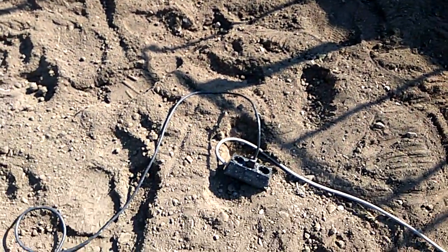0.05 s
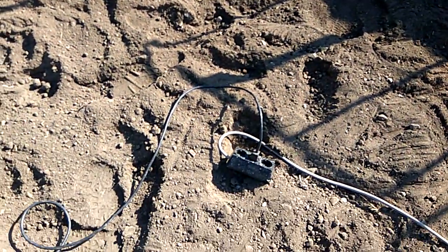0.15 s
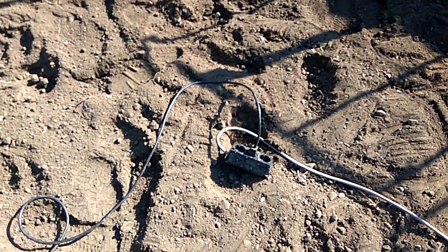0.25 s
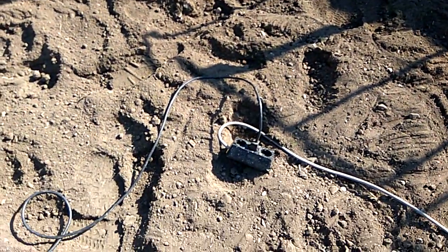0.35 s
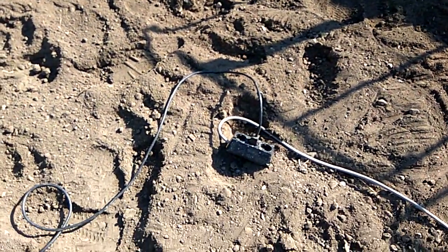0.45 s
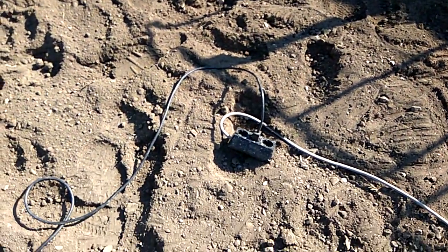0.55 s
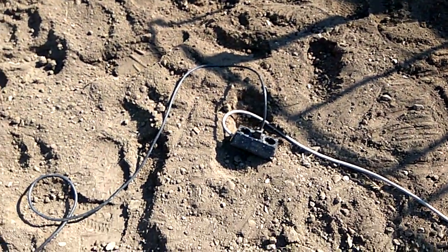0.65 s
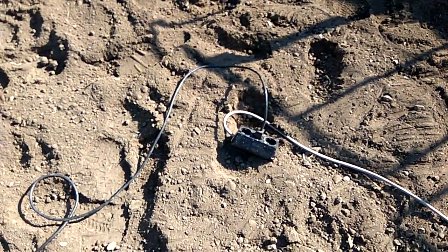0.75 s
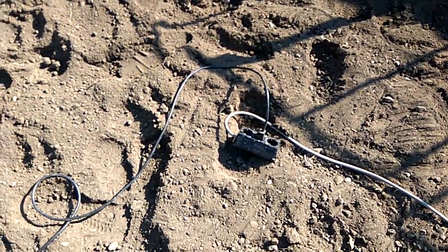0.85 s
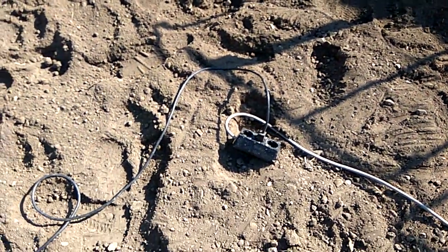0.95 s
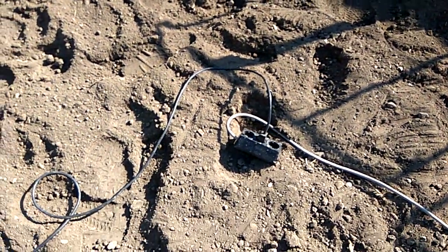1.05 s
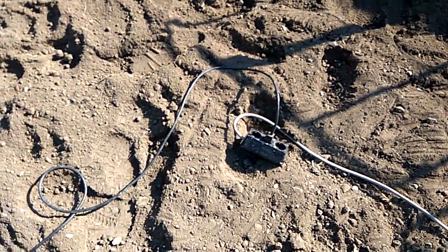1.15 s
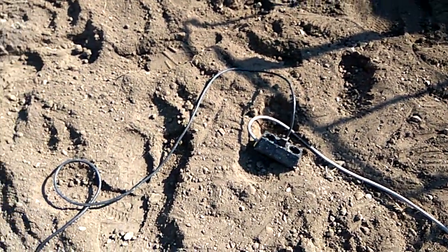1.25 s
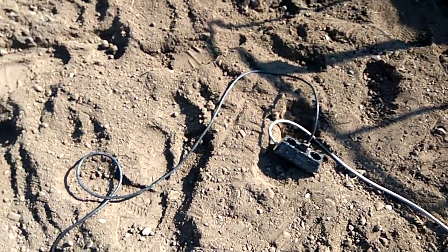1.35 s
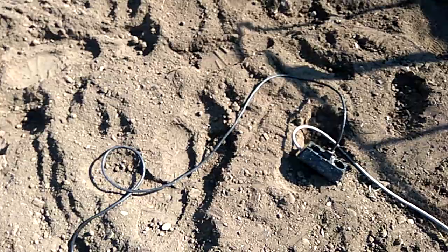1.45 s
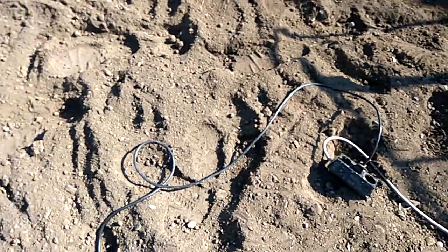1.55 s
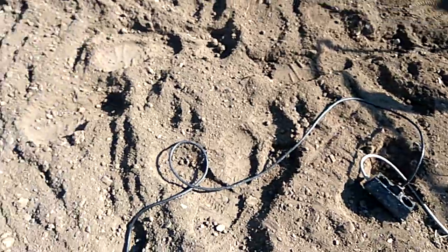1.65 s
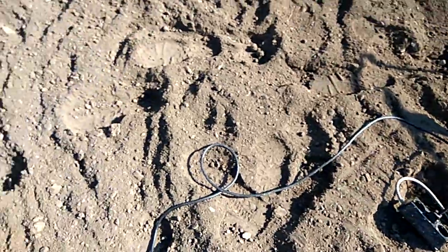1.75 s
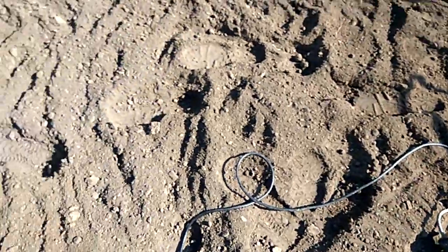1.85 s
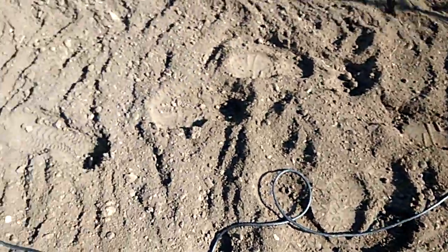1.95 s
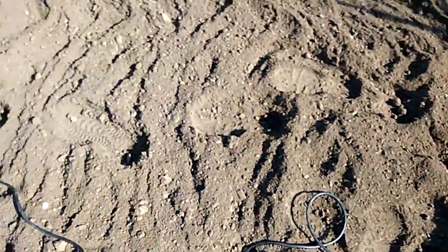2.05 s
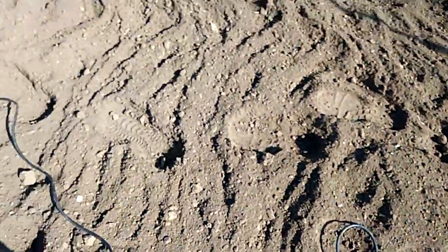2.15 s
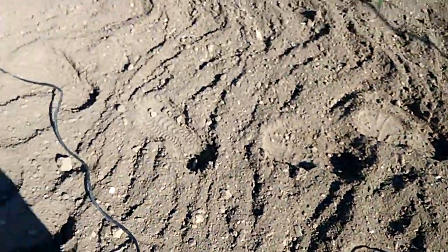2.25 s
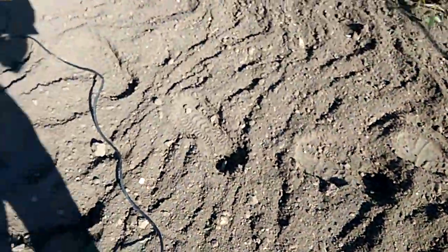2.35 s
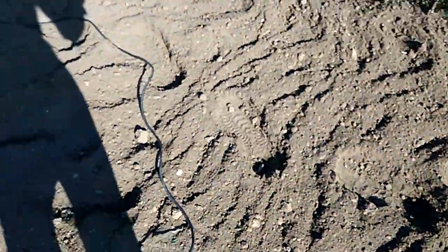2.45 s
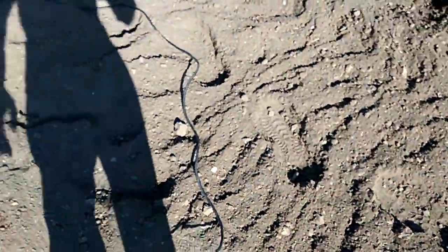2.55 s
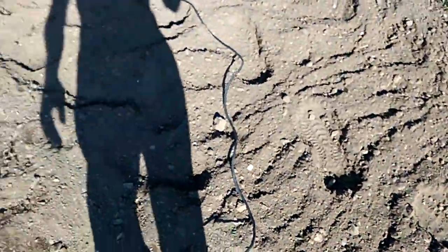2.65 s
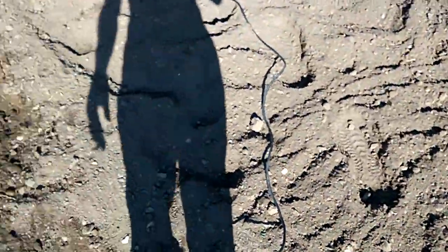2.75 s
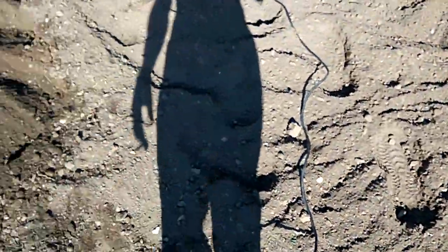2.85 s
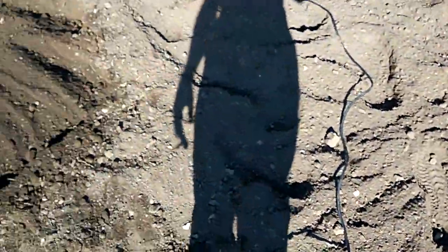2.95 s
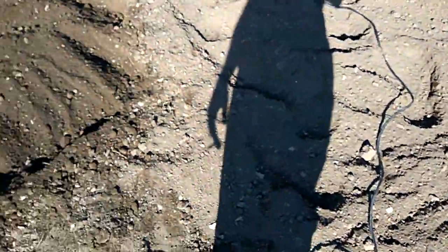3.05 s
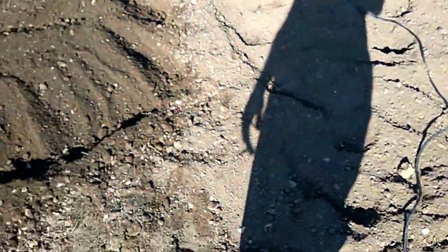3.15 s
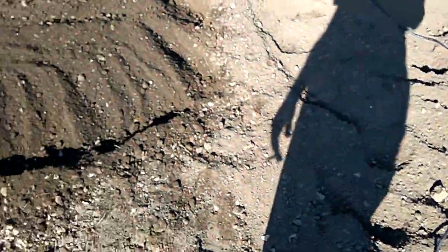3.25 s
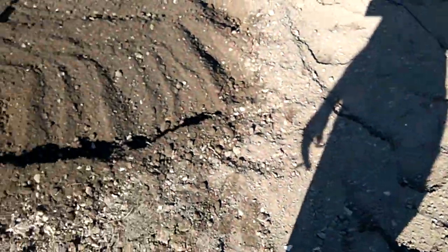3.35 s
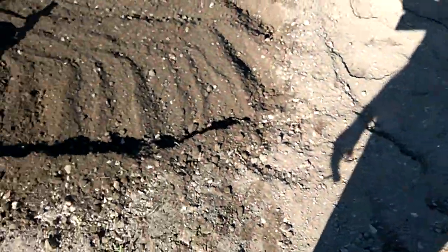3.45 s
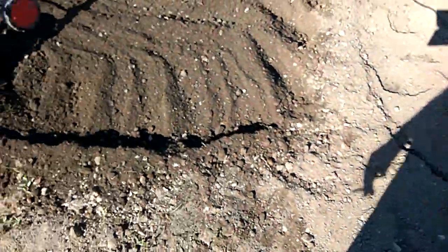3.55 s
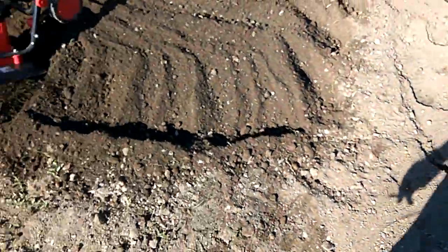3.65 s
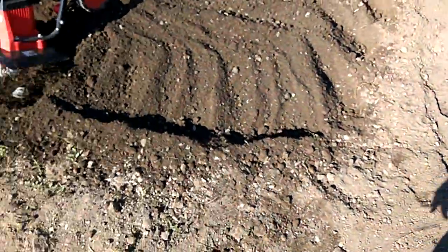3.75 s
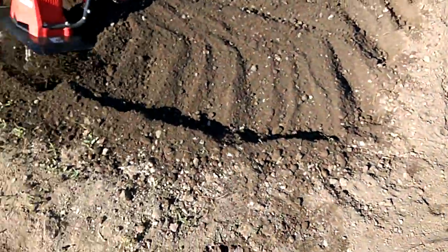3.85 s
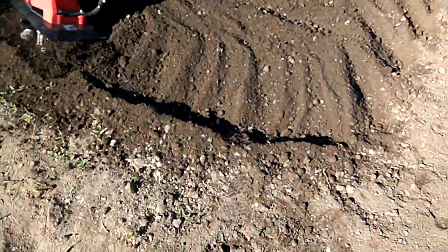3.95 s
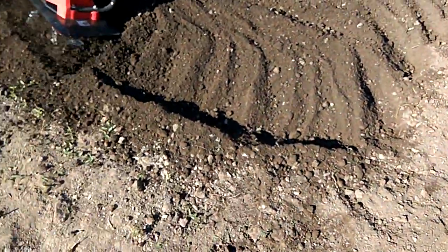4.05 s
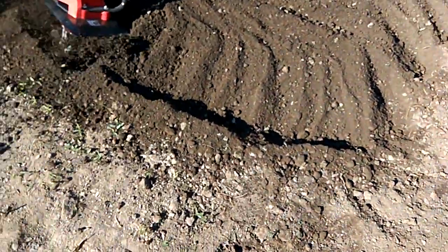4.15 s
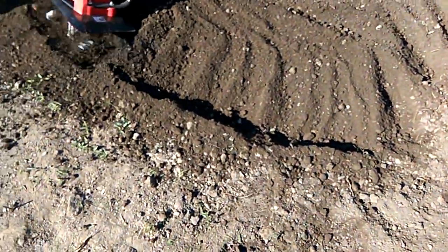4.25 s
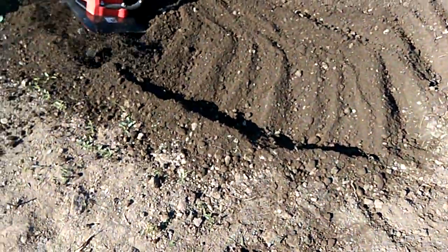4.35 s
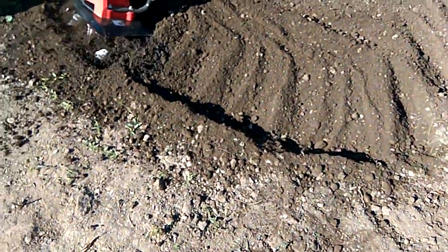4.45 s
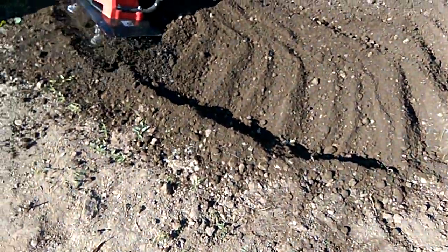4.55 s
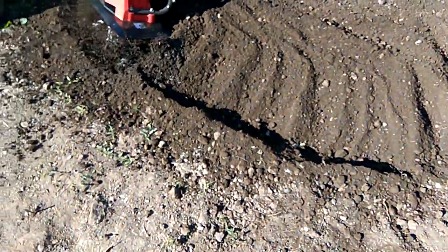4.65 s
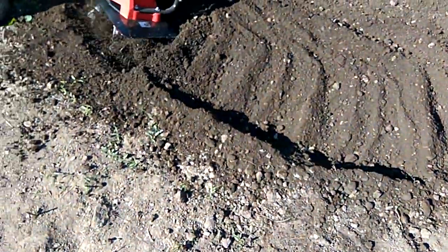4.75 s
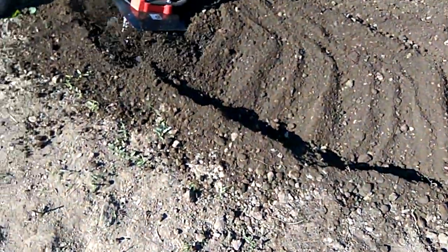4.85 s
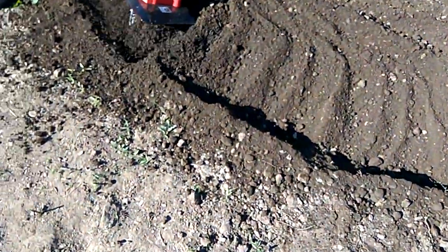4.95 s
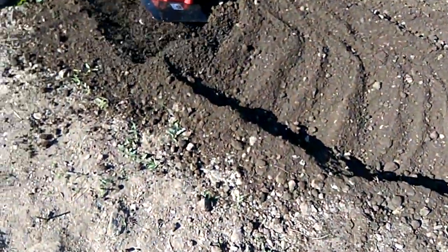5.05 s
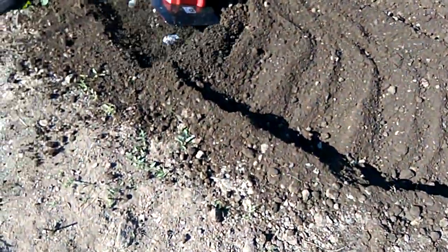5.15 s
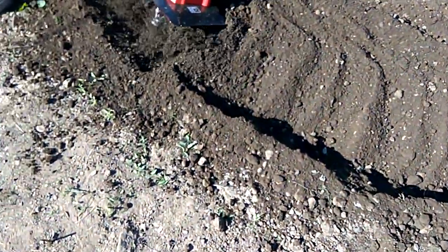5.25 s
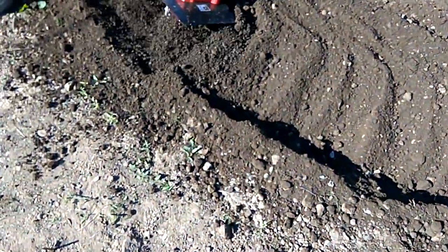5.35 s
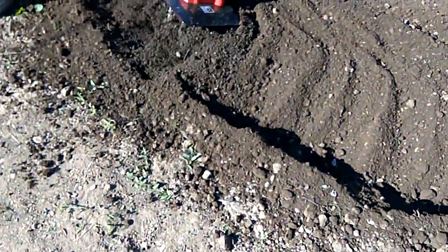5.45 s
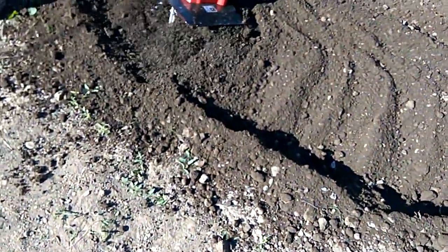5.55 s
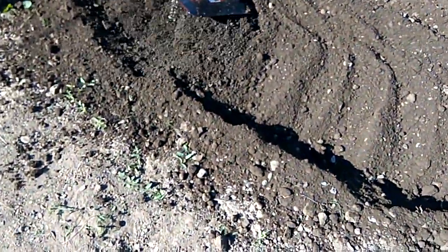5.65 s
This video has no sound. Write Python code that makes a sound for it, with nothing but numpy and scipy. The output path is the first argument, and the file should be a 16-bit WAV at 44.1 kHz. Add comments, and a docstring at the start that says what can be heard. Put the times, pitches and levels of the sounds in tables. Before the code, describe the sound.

A handheld stereo camera hears an electric tiller in a garden, first from behind and then facing it. A buzzing high whine, airy fan rush and fine crumbly grit play throughout. Early bites make the pitch dip quickly; a lighter, quieter passage follows. Later the sound opens up, broad and rough, with repeated labouring dips, jolts and sprays of soil, before easing into a steadier whine. A faint low drone lies far away.

```python
"""An electric tiller works loose soil: its pinion whines, its fan rushes, its tines throw crumbs.
One motor shaft paces the tones; each bite of the tines slows it, chokes the whine and stirs up soil.
The sound reaches the two microphone ports of a camera that starts with its back to the machine,
then swings round to face it. Ground echo and scatter shape the noise on the way.
A faint low drone hangs far over the garden, and a light breeze touches the microphone."""
import sys
import numpy as np
from scipy import signal
from scipy.fft import rfft, irfft, next_fast_len
from scipy.io import wavfile
from scipy.ndimage import uniform_filter1d, map_coordinates

SR = 44100
rng = np.random.default_rng(int(sys.argv[2]) if len(sys.argv) > 2 else 0)


def store_wav(level_fs):
    """Save 16-bit WAV to argv[1]."""
    pcm = np.round(np.clip(np.atleast_2d(level_fs), -1, 1) * 32767)
    wavfile.write(sys.argv[1], SR, pcm.T.astype(np.int16))


N = 250488

PINION_TEETH, WHEEL_TEETH = 7, 29

# Bearing of the machine from the camera:
# (time [s], lag of the left port [ms], how far behind the camera [0-1])
BEARING_PATH = [(0, -0.11, 0.86), (1.2, -0.089, 0.82), (1.6, -0.097, 0.63), (1.95, 0.24, 0.47),
                (2.6, 0.373, 0.13), (3.1, 0.396, 0.23), (3.45, 0.343, 0.1), (3.9, 0.23, 0.13),
                (4.7, 0.16, 0.25), (5.68, 0.071, 0.3)]
# Work of the tines: (time [s], digging load [0-1], rotor hum before trim [dB])
WORK_PATH = [(0, .25, -38), (.7, .15, -38.5), (1.1, 0, -36.5), (1.6, 0, -34), (2.1, 0, -38.5),
             (2.8, .1, -38.5), (3.1, 1, -44), (3.7, 1, -46), (4.5, 1, -44), (4.9, .8, -38), (5.3, .35, -33),
             (5.68, .35, -34)]
# Noise at the tines and fan, before trims:
# (time [s], soil rumble [dB], fan rush [dB], fine grit [dB])
CHURN_LEVELS = [(0, -34, -24, -25.5), (.6, -31, -24.5, -25), (1.35, -34.5, -24, -28),
                (1.93, -29.5, -29.5, -39.5), (2.25, -29, -21, -31.5), (2.7, -26, -19.5, -27.5),
                (3.25, -20, -16, -26.5), (3.75, -23.5, -14, -29.5), (4.5, -23, -15.5, -28),
                (5.1, -23, -14, -24.5), (5.68, -22, -14, -25.5)]


def amp(db):
    """Decibels to gain."""
    return 10 ** (np.asarray(db) / 20)


def unit(x):
    """Scale to rms 1."""
    return x / np.sqrt(np.mean(x ** 2) + 1e-20)


def curves(rows):
    """One value per sample for each column after the time."""
    s, *cols = np.transpose(rows)
    return [np.interp(np.arange(N) / SR, s, c) for c in cols]


def wobble(rate):
    """A smooth random curve of rms 1, rate knots a second."""
    knots = rng.standard_normal(int(N * rate / SR) + 4)
    return unit(map_coordinates(knots, [np.arange(N) * rate / SR]))


def filtered(x, response):
    """Multiply the spectrum of x by a response of frequency."""
    m = next_fast_len(N + 8192)
    return irfft(rfft(x, m) * response(np.fft.rfftfreq(m, 1 / SR)), m)[..., :N]


def along(points, hz):
    """Gain of (frequency [Hz], level [dB]) points on a log frequency axis."""
    f, db = np.transpose(points)
    return amp(np.interp(np.log(hz + 1), np.log(f), db))


def colour(x, points):
    """Shape x by a spectrum."""
    return filtered(x, lambda hz: along(points, hz))


def behind():
    """How far the camera is turned away from the machine, 0-1."""
    return np.clip(curves(BEARING_PATH)[1], 0, 1)


def digging():
    """Load on the tines, 0-1."""
    return curves(WORK_PATH)[0]


def sag(lag_s=0):
    """Turns a second that the shaft loses while a blade cuts into firm soil."""
    # (time [s], sag of the shaft [turns/s], half length [s])
    bites = [(.03, 4, .03), (.15, 6, .03), (.34, 5.5, .035), (.52, 6.5, .05), (1.22, 2, .04),
             (2.13, 2.5, .04), (2.655, 6.5, .035), (2.91, 2.5, .025), (3.36, 3.5, .04), (3.58, 6.5, .06),
             (3.82, 7, .075), (4.06, 8.5, .055), (4.31, 9.5, .065), (4.575, 8.5, .075), (4.84, 3.5, .05)]
    t = np.arange(N) / SR - lag_s
    return sum(hz * np.exp(-((t - s) / half) ** 2) for s, hz, half in bites)


def shaft():
    """Turns of the motor: it sags at each bite, hunts a little and jitters."""
    # Motor shaft between bites: (time [s], speed [turns/s])
    free_speed = [(0, 365), (.24, 366.5), (.45, 364.5), (.66, 363.3), (.78, 359.8), (1, 359.8),
                  (1.1, 357.8), (1.32, 358.2), (1.42, 356.2), (1.95, 355), (2.3, 352.3), (2.5, 353),
                  (2.6, 356.5), (2.8, 358.3), (2.93, 359), (3.1, 372), (3.22, 367), (3.46, 369.5),
                  (3.7, 368), (3.95, 365.3), (4.2, 366.5), (4.45, 365), (4.73, 365), (4.94, 361.3),
                  (5.02, 358.8), (5.15, 358.5), (5.35, 356.2), (5.47, 357.7), (5.68, 356.7)]
    hz = curves(free_speed)[0] - sag()
    unsteady = 1 + .0007 * wobble(14) + .0009 * wobble(45)
    return np.cumsum(hz * unsteady) / SR


def spread(excite, spectrum):
    """Three unrelated excitations: one direct sound for both ports, and the garden's scatter at each."""
    # Share of the noise scattered from the garden: (frequency [Hz], level [dB])
    scatter_share = [(100, -26), (600, -11), (1200, -5), (1900, 0), (2900, -6), (3600, -3.5), (5000, 1),
                     (8000, 0), (14000, 6)]
    facing_db = -11  # change of the scatter from fully turned away to facing
    scatter = amp(facing_db * (0.5 - behind())) * colour(excite[1:], scatter_share)
    return unit(colour(excite[0] + scatter, spectrum))


def crumbs(rate, size_db):
    """Soil crumbs strike, rate hits a second, most small and a few large, on a bed of sliding earth."""
    hits = rng.random((3, N)) < rate / SR
    sizes = amp(size_db * np.minimum(rng.exponential(size=(3, N)), 4))
    impacts = unit(hits * sizes * rng.standard_normal((3, N)))
    sliding = rng.standard_normal((3, N))
    return impacts + sliding


def partial(turns, multiple, flutter_db, wander):
    """One line of the machine at both ports; its strength and phase drift as the machine rocks."""
    phase = 2 * np.pi * (multiple * turns + rng.random())
    sway_db = .5 * np.array([wobble(20.8), wobble(3.8)])  # one per port
    level = amp(flutter_db * wobble(35) + sway_db)
    return np.sqrt(2) * level * np.sin(phase + wander * wobble(60))


def drone():
    """A far low hum: a sine of drifting pitch with a weak octave that wavers."""
    # (time [s], pitch [Hz], level [dB], mean octave level [dB])
    drone_path = [(0, 43.5, -56, -60), (.9, 43.5, -51.5, -53), (1.6, 44, -43.5, -60), (2, 45, -45, -58),
                  (2.15, 45.5, -46, -48), (2.5, 46, -48, -48.5), (2.7, 46, -52, -57),
                  (3.05, 46.5, -64, -72), (3.27, 47, -50, -63), (3.6, 45, -65, -75), (4.5, 45, -70, -78),
                  (5.68, 44, -74, -82)]
    hz, db, octave_db = curves(drone_path)
    phase = 2 * np.pi * np.cumsum(hz) / SR
    octave = amp(octave_db + 2 * wobble(3)) * np.sin(2 * phase)
    return np.sqrt(2) * (amp(db) * np.sin(phase) + octave)


def breeze():
    """Faint low buffeting, unrelated from port to port, that dies away as the camera turns."""
    # Wind on the ports: (frequency [Hz], relative level [dB])
    wind_spectrum = [(25, -8), (45, -11), (80, 12), (150, -12), (400, -40)]
    away_db, facing_db = -47.5, -84
    level_db = facing_db + (away_db - facing_db) * behind()
    gusts_db = 1.4 * wobble(8.4)
    return amp(level_db + gusts_db) * unit(colour(rng.standard_normal((2, N)), wind_spectrum))


def bumps():
    """Soft low thuds on the camera: noise that swells and fades within a tenth of a second."""
    # (time [s], peak level [dB])
    thuds = [(.47, -32.5), (.72, -50), (.8, -39), (3.12, -32.5)]
    t = np.arange(N) / SR
    swell = sum(amp(db) * np.exp(-((t - s) / 0.014) ** 2) for s, db in thuds)
    spectrum = [(25, -24), (55, -2), (200, -6), (600, -13), (2000, -70)]
    return swell * unit(colour(rng.standard_normal(N), spectrum))


def housing():
    """The frame and guard rumble, more as the tines dig, and thump when a clod or a stone jolts them."""
    # (frequency [Hz], relative level [dB])
    frame_spectrum = [(28, -40), (60, -34), (110, -7), (170, -1), (260, 1), (450, -5.5), (800, -4.5),
                      (2000, -45)]
    # (time [s], onset level [dB])
    jolt_list = [(2.624, -30.5), (3.105, -30), (3.321, -31.5), (4.03, -34), (4.7, -29)]
    jolt_decay_s = 0.038
    t = np.arange(N) / SR
    jolts = sum(amp(db) * (t > s) * np.exp(-np.abs(t - s) / jolt_decay_s) for s, db in jolt_list)
    sway_db = .8 * wobble(14)
    rumble = amp(-40.5 + 2.4 * digging() + sway_db)
    return np.hypot(rumble, jolts) * spread(rng.standard_normal((3, N)), frame_spectrum)


def clods():
    """Now and then a clod shatters on the guard in a short spray of coarse crumbs."""
    # (time [s], peak level [dB])
    clod_list = [(2.64, -20), (3.305, -14), (4.73, -18)]
    half_s = 0.011  # half the length of a burst
    t = np.arange(N) / SR
    burst = sum(amp(db) * np.exp(-((t - s) / half_s) ** 2) for s, db in clod_list)
    spectrum = [(150, -20), (500, -9), (2500, 5), (6000, 8), (10000, -2), (15000, -34)]
    return burst * spread(crumbs(rate=2500, size_db=3.5), spectrum)


def churn(turns):
    """Fan air pulsing with the shaft, soil tumbling in the tines, grit spraying on the guard."""
    # Spectra: (frequency [Hz], relative level [dB])
    soil_spectrum = [(150, -29), (400, -24.5), (530, -11), (660, -11), (780, -5), (950, -1), (1080, 2),
                     (1200, 3), (1420, -3), (1700, -8.5), (2200, -4.5), (5000, -59)]
    fan_spectrum = [(600, -45), (1100, -20), (1500, -5), (2100, 2.5), (2600, 6.8), (2950, 1.5), (3400, 3.5),
                    (4300, 3.5), (5200, 4), (7000, -1.5), (7600, -1.5), (8000, -10.5), (10000, -23)]
    grit_spectrum = [(3000, -51), (6500, 1.5), (8400, 13), (10100, 8), (11300, 6), (12300, 7.5), (13700, 2),
                     (15500, -8)]
    shaft_depth, wheel_depth, chatter_db = .09, .025, .5  # rasp of the rush
    bite_soil_db = 0.18  # rise for each turn a second lost
    soil_db, fan_db, grit_db = curves(CHURN_LEVELS)
    lumps_db = .3 * wobble(35)  # uneven resistance of the soil

    wheel = turns * PINION_TEETH / WHEEL_TEETH
    pulse = 1 + shaft_depth * np.sin(2 * np.pi * turns) + wheel_depth * np.sin(2 * np.pi * wheel)
    pulse = pulse * amp(chatter_db * wobble(300))
    air = spread(pulse * rng.standard_normal((3, N)), fan_spectrum)
    fan = amp(fan_db + 0.36 + lumps_db) * air

    soil_level = amp(soil_db + 1.65 + bite_soil_db * sag() + lumps_db)
    soil = soil_level * spread(crumbs(rate=2000, size_db=1.5), soil_spectrum)

    grit_level = amp(grit_db + 3.0 + .7 * wobble(26))
    grit = grit_level * spread(crumbs(rate=14000, size_db=2.5), grit_spectrum)
    return fan + soil + grit


def motor(turns):
    """Rotor hum, fan tones riding on the rush, and two high singing lines, all locked to the shaft."""
    # High lines: (time [s], third multiple of the mesh rate [dB], commutator [dB])
    singing = [(0, -42, -48), (.6, -31, -46.5), (1.5, -31.5, -46), (2, -45, -50), (2.55, -36, -39.5),
               (3.05, -41, -46), (3.4, -28, -47), (3.9, -34, -42.5), (4.9, -32, -39), (5.2, -30.5, -33.5),
               (5.68, -30, -33.5)]
    # Hum overtones: (multiple of the shaft rate, running light [dB], digging [dB])
    hum_overtones = [(2, -48, -42), (3, -47.5, -35)]
    # Fan tones: (multiple of the shaft rate, level relative to the untrimmed fan rush [dB])
    blade_tones = [(8, -17.5), (9, -24), (10, -22), (12, -22), (14, -23), (16, -22), (19, -22)]
    commutator_order = 38  # multiple of the shaft rate
    load, hum_db = curves(WORK_PATH)
    fan_db = curves(CHURN_LEVELS)[1]
    overtone_db, commutator_db = curves(singing)
    shake = .25 + .35 * load  # digging jolts the rotor, radians

    tone = amp(hum_db - 2.0) * partial(turns, 1, flutter_db=2.5, wander=shake)
    for k, light, heavy in hum_overtones:
        level = amp(light + load * (heavy - light))
        tone = tone + level * partial(turns, k, flutter_db=2.0, wander=shake)
    for k, db in blade_tones:
        tone = tone + amp(fan_db + db) * partial(turns, k, flutter_db=3, wander=.3)
    overtone = partial(turns, 3 * PINION_TEETH, flutter_db=1.5, wander=.4 + .4 * load)
    commutator = partial(turns, commutator_order, flutter_db=2, wander=.8 + load)
    return tone + amp(overtone_db) * overtone + amp(commutator_db) * commutator


def gears(turns):
    """Pinion teeth strike the wheel; its runout swells and bends the mesh each wheel turn, more under load."""
    # Whine before bites and trim: (time [s], level [dB])
    whine_levels = [(0, -17), (.05, -24), (.12, -15.5), (.18, -24), (.3, -20), (.38, -21.5), (.46, -21),
                    (.56, -17.5), (.62, -26.5), (.72, -24), (.85, -24.5), (1.02, -24), (1.1, -28),
                    (1.22, -31), (1.44, -26), (1.57, -26), (1.71, -34), (1.82, -33), (1.91, -19),
                    (2.05, -21), (2.2, -20), (2.35, -19), (2.44, -15.5), (2.63, -16), (2.75, -18),
                    (2.85, -21.5), (3.02, -23), (3.14, -21.5), (3.3, -20), (4.3, -13), (5, -17), (5.3, -16),
                    (5.68, -18)]
    # Balance between the ports: (time [s], left minus right [dB])
    port_lean = [(0, -4), (1, 4), (1.5, 12.5), (1.8, 2), (2, 8), (2.6, 7), (3, 5.5), (3.4, -7.5),
                 (4.5, -0.5), (5.3, -5), (5.68, -9.5)]
    # Tooth mesh: (multiple of the mesh rate, sideband [wheel turns],
    # level running light [dB], level digging [dB])
    mesh_lines = [(1, -2, -23, -14), (1, -1, -13.5, -10), (1, 0, -.4, -1.8), (1, 1, -12, -5.5),
                  (1, 2, -17, -14), (2, -1, -21.5, -15.5), (2, 0, -18.5, -15), (2, 1, -24, -20),
                  (3, -1, -25, -22)]
    choke_db, choke_lag_s = 0.3, 0.0099  # loss per turn a second lost, just after the bite
    pivot_db, follow = -21.5, 0.27  # overtones follow a share of the whine's swing about the pivot
    runout_bend = .7  # radians: 0 = swell only, a quarter turn = bend only
    level_db = curves(whine_levels)[0] - choke_db * sag(choke_lag_s) + .6 * wobble(16)
    lean_db, load = curves(port_lean)[0], digging()
    slack = (.2 + .13 * load) * wobble(70)  # play between the teeth, radians
    overtone_db = (follow - 1) * (level_db - pivot_db)

    tone = 0
    for k, side, light, heavy in mesh_lines:
        phase = 2 * np.pi * PINION_TEETH * (k + side / WHEEL_TEETH) * turns + k * slack
        bend = runout_bend * abs(side) + .5 * side * wobble(25)
        line_db = light + load * (heavy - light) + (k > 1) * overtone_db
        tone = tone + amp(line_db) * np.sin(phase + bend)

    port_sway_db = 0.29 * np.array([wobble(22.0), wobble(41)])
    balance = amp(np.array([lean_db, -lean_db]) / 2 + port_sway_db)
    chatter = amp((.4 + .8 * load) * wobble(150) + (.6 + .6 * load) * wobble(30))
    return np.sqrt(2) * amp(level_db - 0.5) * unit(balance) * unit(chatter) * tone


def uneven(x, depth_db):
    """Slow random unevenness of the noise over frequency and time, drawn separately for each port."""
    z = signal.stft(x, nperseg=512)[2]
    field = rng.standard_normal(z.shape)
    # smooth along frequency (axis 1), then along time (axis 2)
    for axis, size in [(1, 5), (1, 3), (2, 60), (2, 14)]:
        field = uniform_filter1d(field, size, axis)
    return signal.istft(z * amp(depth_db * unit(field)), nperseg=512)[1][:, :N]


def ground(x):
    """Add the ground's echo, whose shifting delay sweeps a comb through the rush as the camera swings."""
    # (time [s], delay [ms], strength at the left port [0-1])
    echo_path = [(0, 0.035, 0), (1.9, 0.62, 0), (2.3, 0.18, 0.08), (2.55, 0.26, 0.06), (2.85, 0.14, 0),
                 (3.2, 0.18, 0), (3.6, 0.294, 0.2), (4, 0.3, 0.33), (5.68, 0.3, 0)]
    right_share = 0.41  # the right port's share of that echo
    delay_ms, strength = curves(echo_path)
    at = np.arange(N) - delay_ms * SR / 1000
    share = np.clip(strength * np.array([[1], [right_share]]), 0, 1)
    echo = np.array([map_coordinates(port, [at]) for port in x])
    return (x + share * echo) / np.sqrt(1 + share ** 2)


def ports(x):
    """Bearing delays one port against the other and shades the right; a reflection turns the left's phase."""
    # Shadow on the right port when fully turned away: (frequency [Hz], level [dB])
    shadow = [(800, 0), (1500, -12.5), (2200, -2.5), (3000, -8), (4300, -5), (5700, -4), (7200, -17.5),
              (10000, -15.5), (12500, -18), (14000, -8)]
    # Reflection competing with the direct sound at the left port:
    # (time [s], cancelling frequency [Hz], strength [0-1])
    reflection = [(0, 4500, 0), (2.3, 4800, 0.04), (2.6, 4600, 0.25), (2.8, 4250, .9), (3.2, 3100, 1),
                  (3.6, 2300, 1), (4, 1980, .85), (4.5, 1800, .75), (5.3, 1560, .35), (5.68, 1480, .25)]
    width_hz = 620
    hz, t, z = signal.stft(x, SR, nperseg=512, noverlap=384)
    hz = hz[:, None]
    frames = np.minimum(np.round(t * SR).astype(int), N - 1)
    paths = curves(BEARING_PATH) + curves(reflection)
    lag_ms, away, cancel_hz, strength = (c[frames] for c in paths)
    resonance = 1j * hz * width_hz / (cancel_hz ** 2 - hz ** 2 + 1j * hz * width_hz)
    lag = np.exp(-2j * np.pi * hz * lag_ms / 1000)
    left = z[0] * lag * (1 - 2 * np.clip(strength, 0, 1) * resonance)
    right = z[1] * along(shadow, hz) ** np.clip(away, 0, 1)
    return signal.istft(np.array([left, right]), SR, nperseg=512, noverlap=384)[1][:, :N]


def scene():
    """One shaft paces the machine's tones; the camera's body colours the noise while it looks away."""
    # Colour of the machine behind the camera: (frequency [Hz], level [dB])
    body_colour = [(400, 17), (900, -17), (1600, 10), (2200, -8), (3000, 4), (5000, -2), (5700, -7),
                   (7000, 2), (9000, -17), (10000, -6), (11400, -31), (15000, -20)]
    # Shudder as the tines climb out and drop back in: (time [s], rms swing of the whine [dB])
    shudder_swing = [(2.68, 0), (2.8, 1.2), (3.02, 2.2), (3.16, 0)]
    turns = shaft()
    away = behind()
    noise = ground(uneven(churn(turns) + clods(), depth_db=1.5))
    noise = (1 - away) * noise + away * colour(noise, body_colour)
    shudder_db = curves(shudder_swing)[0] * wobble(65)
    shaken = amp(shudder_db / 2) * noise + amp(shudder_db) * gears(turns)
    machine = shaken + motor(turns) + housing()
    return ports(machine) + drone() + bumps() + breeze()


def record(dry):
    """The camera rounds the highest peaks, sheds the deepest bass and keeps nothing above its band limit."""
    top_hz, bass_hz = 15750, 37
    rounded = dry / (1 + np.abs(dry / .92) ** 8) ** (1 / 8)
    return filtered(rounded, lambda hz: (hz < top_hz) * (1 - np.exp(-(hz / bass_hz) ** 6)))


dry = scene()
out = record(dry)
store_wav(out)
```